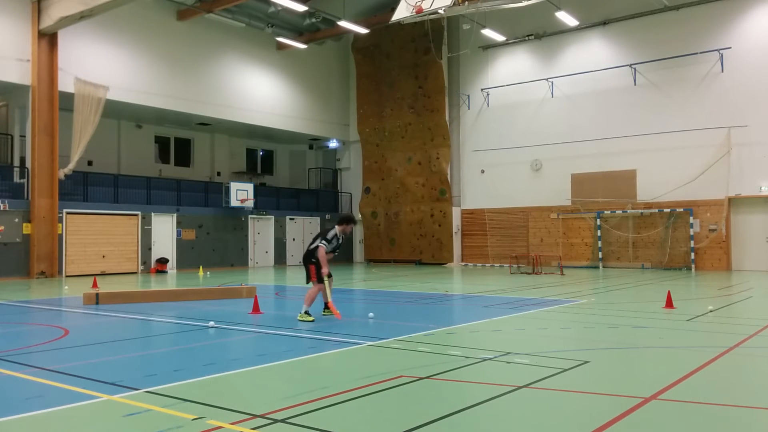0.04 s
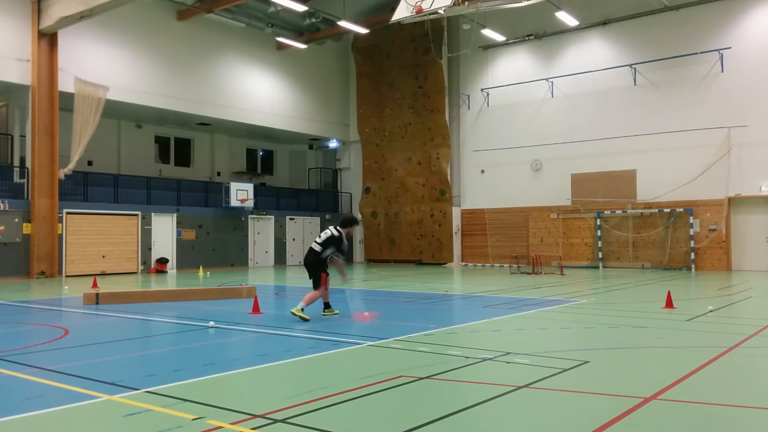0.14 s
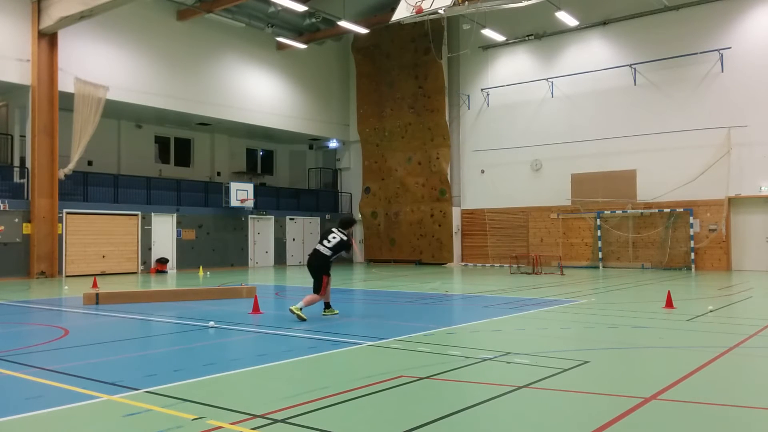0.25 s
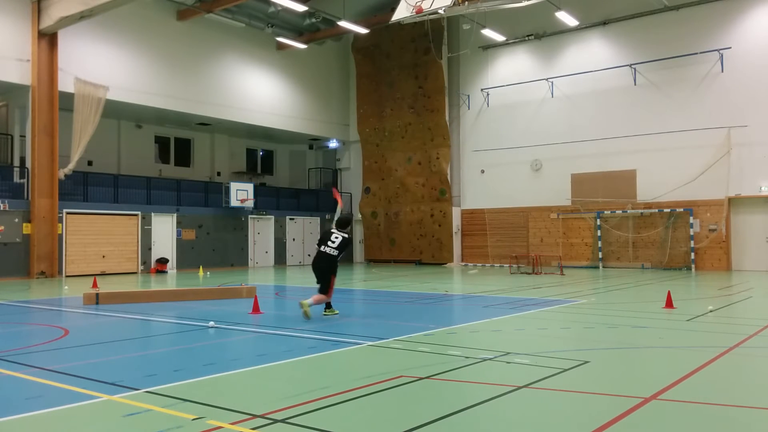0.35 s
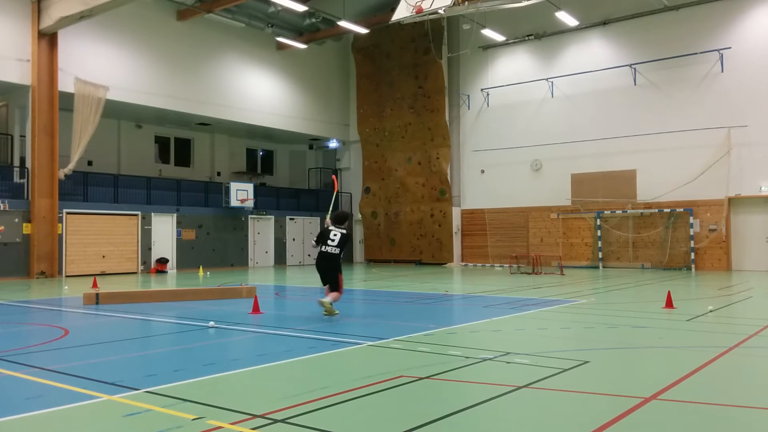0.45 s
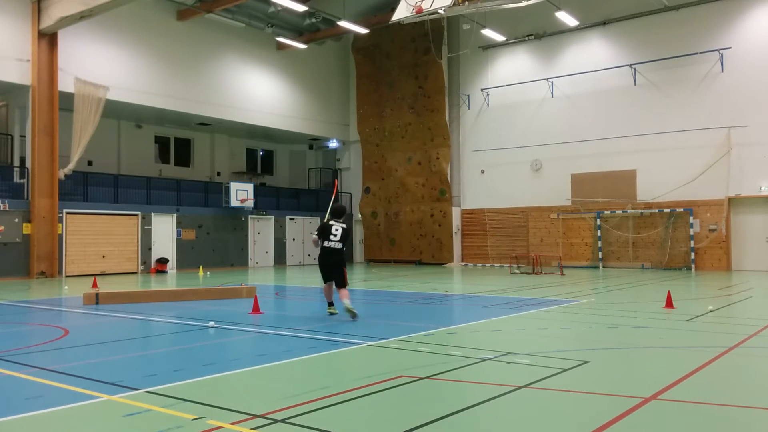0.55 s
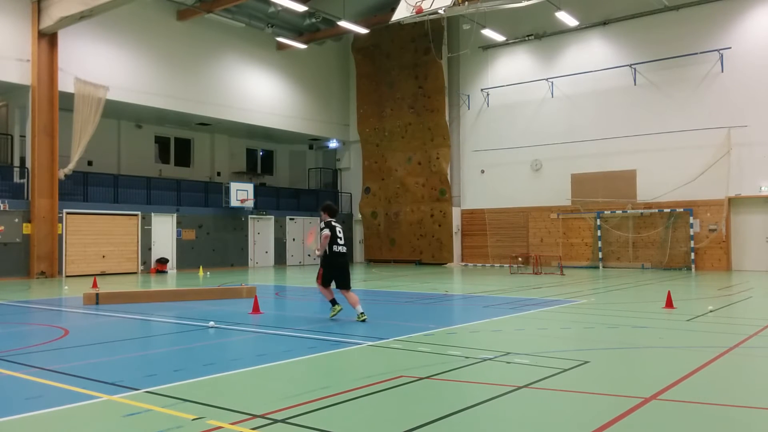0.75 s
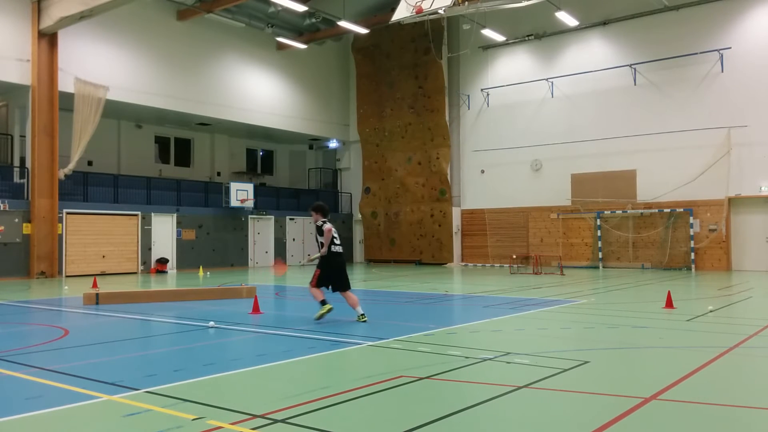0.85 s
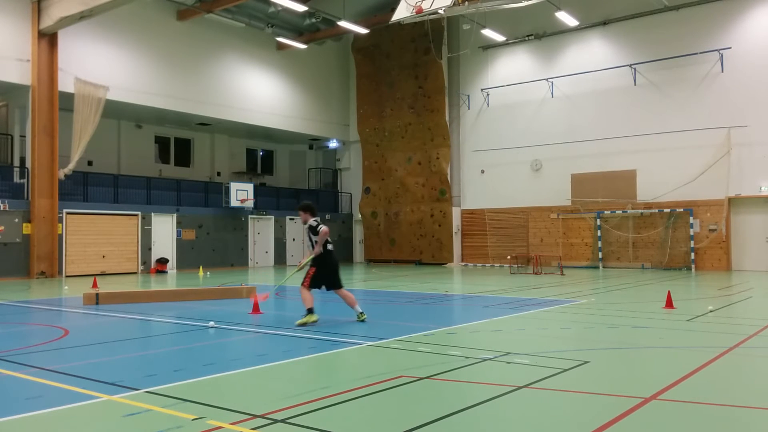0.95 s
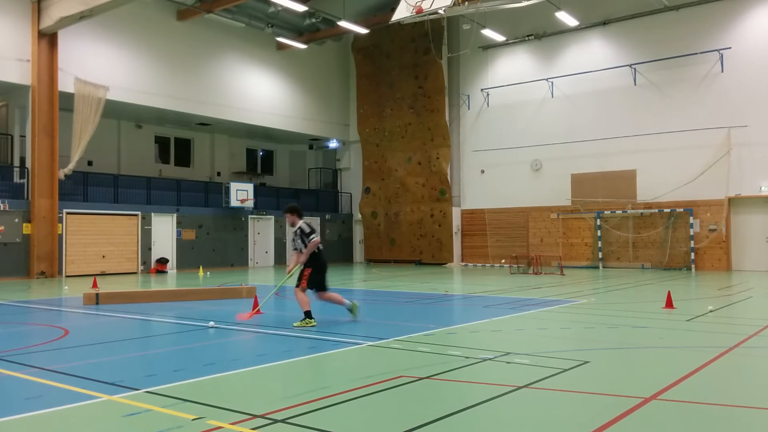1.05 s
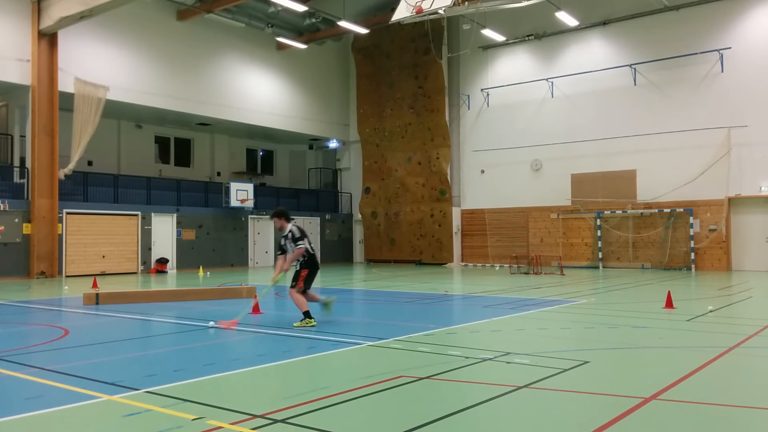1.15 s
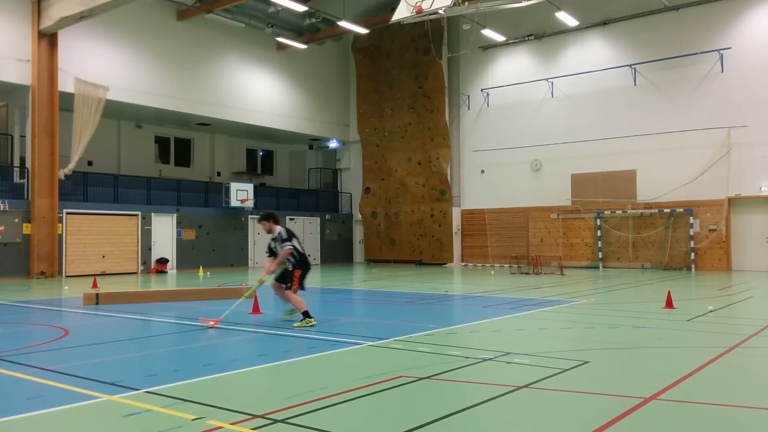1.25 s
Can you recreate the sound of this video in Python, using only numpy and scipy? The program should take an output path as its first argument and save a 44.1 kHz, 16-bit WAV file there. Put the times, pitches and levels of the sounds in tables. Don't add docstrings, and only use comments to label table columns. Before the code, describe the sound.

One loud, snappy stick hit on a light plastic ball bursts early, with dense echoes and a long darkening reverb in a big gym; a shoe squeak-like scuff and small blade taps follow, on a bass-light microphone with noise suppression.

```python
import sys
import numpy as np
from scipy import signal
from scipy.fft import rfft, irfft, next_fast_len
from scipy.io import wavfile
from scipy.ndimage import uniform_filter1d

SR = 44100
rng = np.random.default_rng(int(sys.argv[2]) if len(sys.argv) > 2 else 0)


def wav_record(signal):
    frames = np.transpose(np.atleast_2d(signal))
    bounded = np.clip(frames, -1, 1)
    quanta = np.round(bounded * 32767).astype(np.int16)
    wavfile.write(sys.argv[1], SR, quanta)


def boost_factor(decibels):
    exponent = np.asarray(decibels, float) / 20
    return 10 ** exponent


N = 57330

# frequency in Hz, level in dB per Hz.
VENTILATION_COLOUR = [(15, -33), (25, -18), (266, -9.5), (368, -3.5), (1150, -16.5), (1730, -21),
                      (3320, -32), (14800, -58), (16500, -60)]
# start in seconds, snap level in dB, snap pitch in Hz, thud level in dB, smear in seconds.
TAPS = [(.0570, -68, 2050, -42.5, .0004), (.0575, -76, 4850, -86, .0004), (.0655, -70, 6100, -43, 0.00035),
        (.0770, -65, 1910, -71, .0008), (.0690, -65.5, 1710, -62, .001), (.0955, -89.5, 3020, -48, .0003),
        (1.0431, -42, 7800, -48, .0002), (1.0434, -30, 1930, -51.5, 0.00018),
        (1.0433, -22.5, 3130, -29.5, .0002), (1.0434, -30.5, 5330, -25.5, 0.00013),
        (1.0517, -34, 7400, -24.5, 0.00022), (1.0521, -30, 3850, -52, 0.000084),
        (1.0523, -27.5, 2044, -67, 0.00012), (1.2068, -43.5, 8850, -80, .0002),
        (1.2160, -36.5, 8700, -87.5, 0.00017)]
CRACK_AND_ECHOES = [(.2264, -8, 8400, -6.5, .0002), (.2316, -34, 6000, -12, .0001),
                    (.2345, -8, 7300, -11, .00015), (.2379, -16, 6800, -26, .0002),
                    (.2399, -18, 7400, -16, .0004), (.2468, -12, 8300, -30, .0008),
                    (.2474, -9, 5000, -7, .0009), (.2512, -20, 7600, -15, .0005),
                    (.2550, -17, 8000, -30, .0006), (.2554, -12, 5400, -14, .0008),
                    (.2592, -26, 11500, -22, .0004), (.2653, -15, 7800, -15, .0004),
                    (.2686, -21, 3800, -22, .0005), (.2725, -28, 5600, -21, .0005),
                    (.2856, -13, 8300, -24, .0004), (.2910, -24, 6200, -24, .001),
                    (.3080, -25, 3500, -22, .0005), (.3190, -24, 3300, -22, .0005),
                    (.3258, -26, 8000, -20, .0005), (.3440, -24, 8200, -22, .001),
                    (.3595, -30, 4000, -19, .0005)]
SHOE_LANDING = [
    (.7420, -28, 543, -46, 0.0032),
]
# frequency in Hz, level in dB.
GRIT_COLOUR = [(1000, -20), (3000, -5), (5000, 2), (9000, 0), (11000, -6), (15500, -8)]
# frequency in Hz, 60 dB decay time in seconds.
SMALL_DECAY = [(500, 1), (4000, 0.35), (12000, 0.85)]
# peak time in seconds, level in dB, rise in seconds, fall in seconds.
BLADE_SLIDES = [
    (.165, -75.5, 0.046, 0.053),
    (1.07, -61, 0.023, 0.02),
    (1.224, -54, 0.0094, .008),
]
# frequency in Hz, level in dB per Hz.
BLADE_COLOUR = [(4000, -28.5), (6500, -2), (8300, 2.5), (10500, -9.5), (16000, -23.5)]
# peak time in seconds, level in dB, rise in seconds, fall in seconds.
SCUFFS = [
    (.2245, -39.5, 0.0018, 0.00214),
    (.716, -66, 0.0024, .004),
    (.7245, -40.5, 0.0018, 0.0042),
    (.731, -42, 0.0042, 0.011),
]
# frequency in Hz, level in dB per Hz.
SOLE_COLOUR = [(4200, -5.5), (5200, 4.5), (7400, 0.5), (9600, -7), (13000, -21.5), (16000, -30)]
# frequency in Hz, level in dB, 60 dB decay time in seconds.
FLOOR_BOARDS = [(105, -26.5, 0.12), (370, -21, .09), (520, -33.5, 0.049), (762, -23.5, 0.054)]
# frequency in Hz, level in dB per Hz.
HALL_COLOUR = [(60, -16), (340, -3), (800, -3.5), (1700, -6), (2200, -13), (4300, -11.5), (5600, -12.5),
               (8400, -15), (14500, -26), (16000, -50)]
# frequency in Hz, 60 dB decay time in seconds.
HALL_DECAY = [(100, 1.62), (350, 1.12), (1000, 2.98), (2200, 2.64), (4300, 2.1), (5200, 1.265),
              (8000, 1.01), (14000, 0.39)]
# start in seconds, end in seconds, treble gain in dB, corner in Hz.
TREBLE_SHUTS = [
    (0.403, 0.711, -12.5, 6960),
    (0.832, 1.056, 1, 6100),
    (1.115, 1.236, -5.5, 4170),
    (1.224, 1.4, -11, 4050),
]
# time in seconds, gain in dB.
PUMPING = [(0, -5.5), (.05, -2.5), (.265, 1.5), (.295, -4), (.325, -0.5), (.78, 1), (.84, 0), (1.03, -1),
           (1.06, -1), (1.11, -2), (1.132, -11), (1.148, -4), (1.172, -1), (1.2, -6.5), (1.224, -8.5),
           (1.246, 2), (1.262, -7), (1.3, -13.5)]
# frequency in Hz, level in dB per Hz.
HISS_COLOUR = [(30, 18), (90, 22.5), (300, -8), (2000, -7.5), (9000, -0.5), (15500, -2), (16200, -56.5)]


def unit(x):
    return x / np.sqrt(np.mean(x ** 2) + 1e-20)


def along(points, hz):
    f, v = np.transpose(points)
    return np.interp(np.log(hz + 1), np.log(f + 1), v)


def filtered(x, response):
    m = next_fast_len(N + SR // 2)
    return irfft(rfft(x, m) * response(np.fft.rfftfreq(m, 1 / SR)), m)[:N]


def noise(colour):
    return unit(filtered(rng.standard_normal(N), lambda hz: boost_factor(along(colour, hz))))


def dying(x, decay):
    hz, t, z = signal.stft(x, SR, nperseg=256)
    fade = boost_factor(-60 * t / along(decay, hz)[:, None])
    return signal.istft(z * fade, SR, nperseg=256)[1][:N]


def ring(hz, t60, t):
    return np.sin(2 * np.pi * hz * t) * boost_factor(-60 * t / t60)


def blows(rows, grit_db, ring_db, edge_db):
    body, grit = np.zeros(N + SR), np.zeros(N + SR)
    t = np.arange(SR // 40) / SR
    thud = ring(880, .007, np.clip(t - .00015, 0, None))
    thud = thud + boost_factor(ring_db) * ring(4300, .01, np.clip(t - .0011, 0, None))
    for start, snap_db, snap_hz, thud_db, smear in rows:
        rise = boost_factor(snap_db) * (1 - np.exp(-(t / max(smear, 1e-5)) ** 2))
        slow = 1 + smear / .0007
        snap = ring(snap_hz, .0035 * slow, t) + boost_factor(edge_db) * ring(12800, .002 * slow, t)
        grit_fade = slow * boost_factor(grit_db - 60 * t / (.003 * slow))
        i = round(start * SR)
        body[i:i + len(t)] += rise * snap - boost_factor(thud_db) * thud
        grit[i:i + len(t)] += rise * grit_fade * rng.standard_normal(len(t))
    body = filtered(body[:N], lambda hz: 1j * hz / (297 + 1j * hz))
    return body + filtered(grit[:N], lambda hz: boost_factor(along(GRIT_COLOUR, hz)))


def slides(rows, colour):
    t = np.arange(N) / SR
    stroke = np.zeros(N)
    for peak, db, rise, fall in rows:
        stroke += boost_factor(db) * np.exp(-((t - peak) / np.where(t < peak, rise, fall)) ** 2)
    grain = unit(uniform_filter1d(rng.standard_normal(N), size=40))
    grain_db = 4.5
    return stroke * unit(noise(colour) * boost_factor(grain_db * grain))


def ventilation():
    return boost_factor(-65) * noise(VENTILATION_COLOUR)


def taps():
    return blows(TAPS, grit_db=-13.5, ring_db=-29.5, edge_db=-41.5)


def hall_answer(x):
    lag_s = 0.0061
    tail = dying(rng.standard_normal(N), SMALL_DECAY)
    response = np.pad(tail / np.linalg.norm(tail), (round(lag_s * SR), 0))
    return boost_factor(-6) * signal.fftconvolve(x, response)[:N]


def blade_slides():
    return slides(BLADE_SLIDES, BLADE_COLOUR)


def scuffs():
    return slides(SCUFFS, SOLE_COLOUR)


def crack():
    return blows(CRACK_AND_ECHOES, grit_db=-6, ring_db=-15, edge_db=-12)


def hall_tail():
    t = np.arange(N) / SR
    flutter_db, rise_s = 1, .014
    lumps = unit(uniform_filter1d(rng.standard_normal(N), size=200))
    tail = dying(noise(HALL_COLOUR) * boost_factor(flutter_db * lumps), HALL_DECAY)
    tail = tail * (1 - np.exp(-t / rise_s))
    return boost_factor(-26) * np.pad(tail, (round(CRACK_AND_ECHOES[0][0] * SR), 0))[:N]


def floor_boom():
    start_s, rise_s = .246, .006
    t = np.clip(np.arange(N) / SR - start_s, 0, None)
    boards = sum(boost_factor(db) * ring(hz, t60, t) for hz, db, t60 in FLOOR_BOARDS)
    return (1 - np.exp(-t / rise_s)) * boards


def shoe_landing():
    return blows(SHOE_LANDING, grit_db=-60, ring_db=-60, edge_db=-60)


def scene():
    small = taps() + blade_slides() + scuffs() + shoe_landing()
    big = crack() + hall_tail() + floor_boom()
    return (ventilation() + small + hall_answer(small) + big)[None]


def suppressed(mic):
    t = np.arange(N) / SR
    slope, fade_s = 9.4, .012
    x = mic
    for start, end, db, corner_hz in TREBLE_SHUTS:
        treble = filtered(mic, lambda hz: 1 / (1 + (corner_hz / (hz + 1)) ** slope))
        shut = np.clip(np.minimum(t - start, end - t) / fade_s, 0, 1)
        x = x + treble * (boost_factor(db * shut) - 1)
    return x * boost_factor(np.interp(t, *np.transpose(PUMPING)))


def hiss(x):
    loudness = np.sqrt(np.abs(uniform_filter1d(x ** 2, size=2000)))
    return (boost_factor(-78.5) + boost_factor(-55) * loudness) * noise(HISS_COLOUR)


def roll_off(x):
    return signal.sosfilt(signal.butter(12, 16950, fs=SR, output="sos"), x)


def record(dry):
    low_hz, top_hz = 173, 16300
    mic = filtered(dry[0], lambda hz: (1j * hz / (low_hz + 1j * hz)) ** 2 * (hz < top_hz))
    x = suppressed(mic)
    mix = x + hiss(x)
    return roll_off(mix[None])


dry = scene()
out = record(dry)
wav_record(out)
```